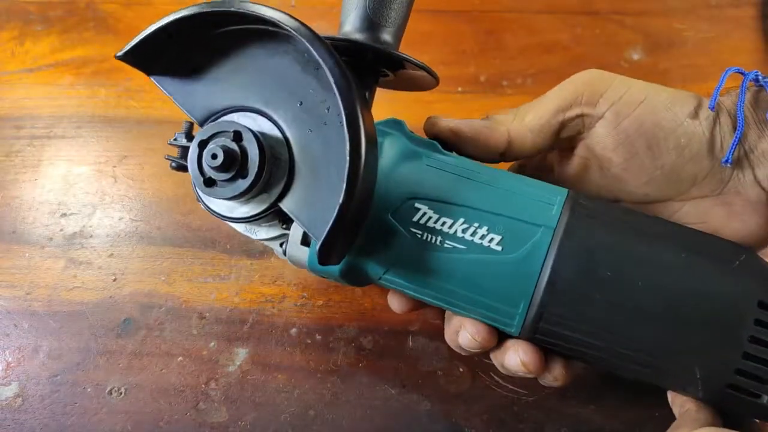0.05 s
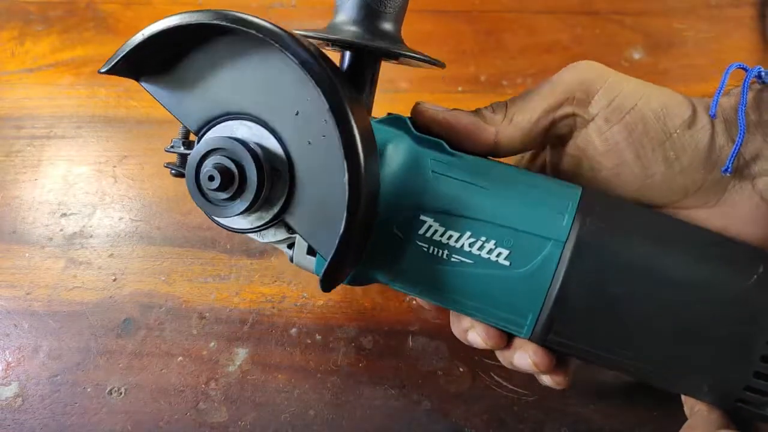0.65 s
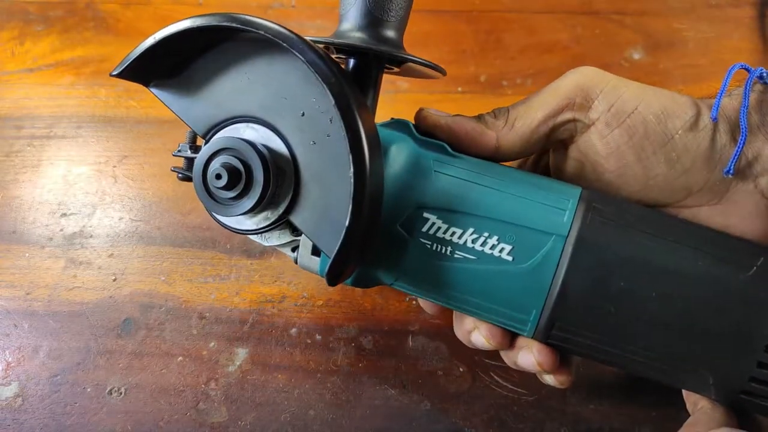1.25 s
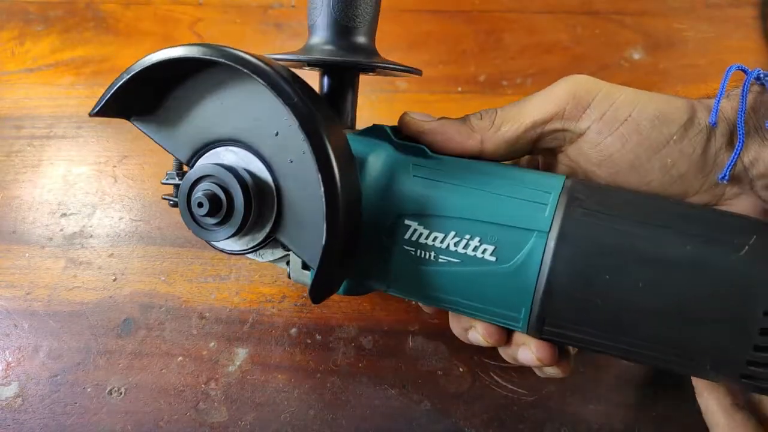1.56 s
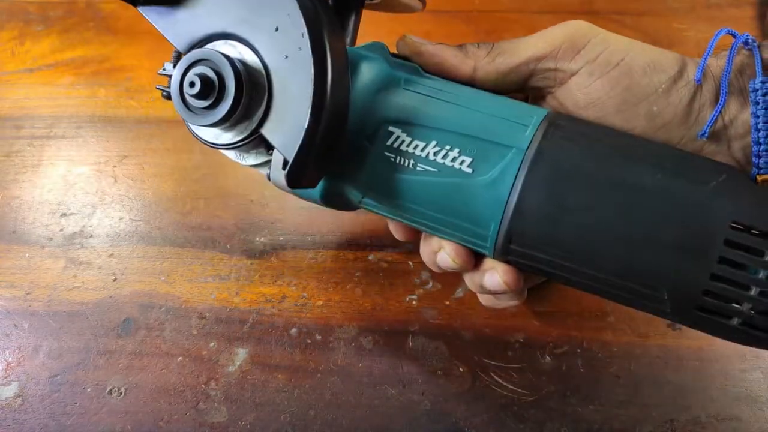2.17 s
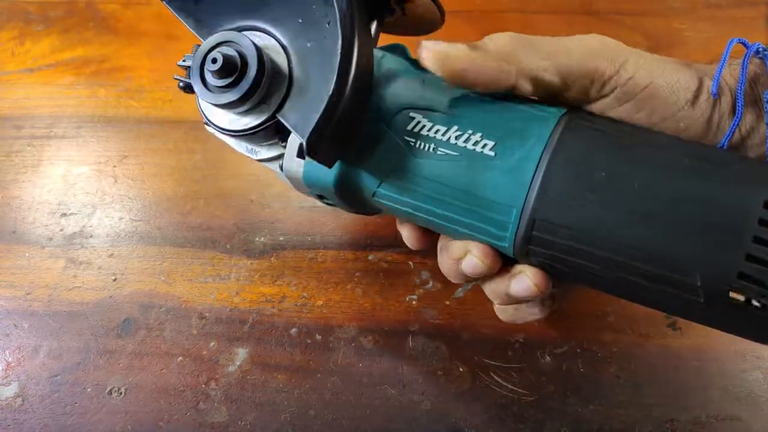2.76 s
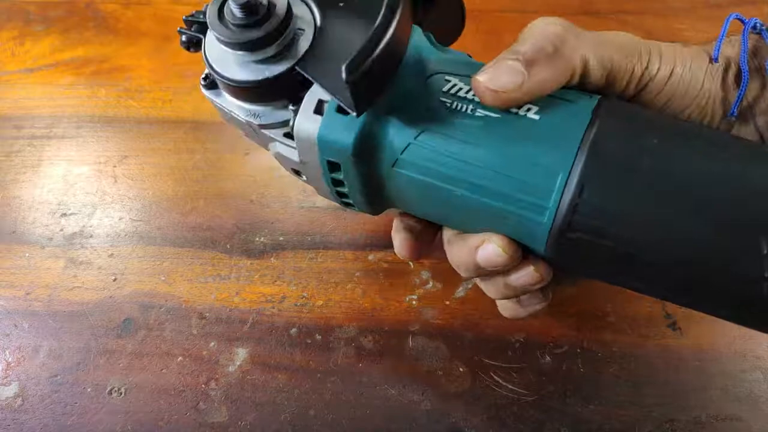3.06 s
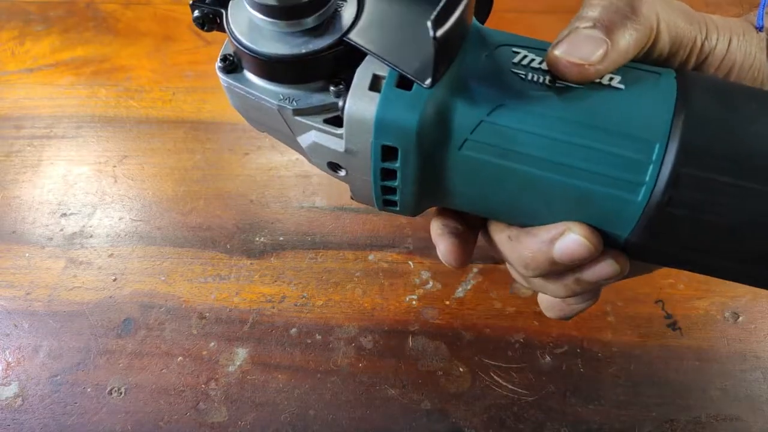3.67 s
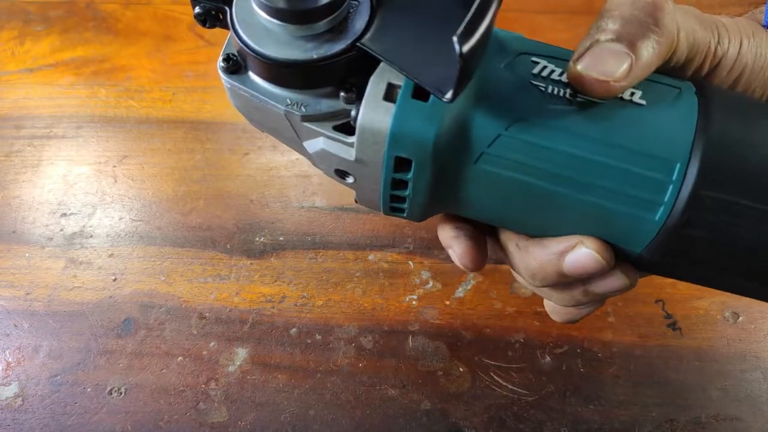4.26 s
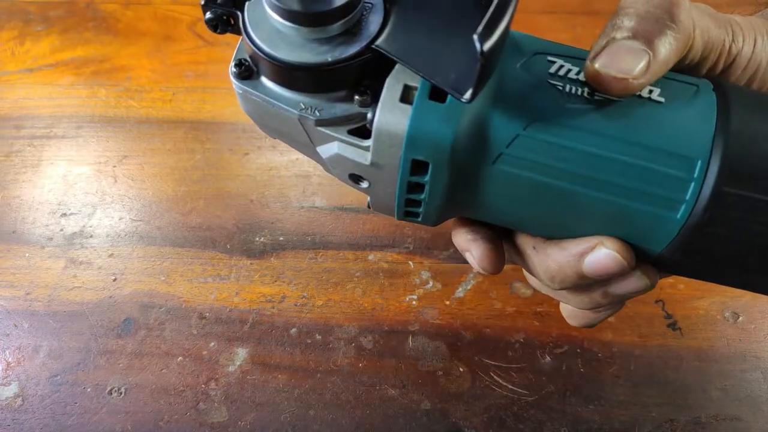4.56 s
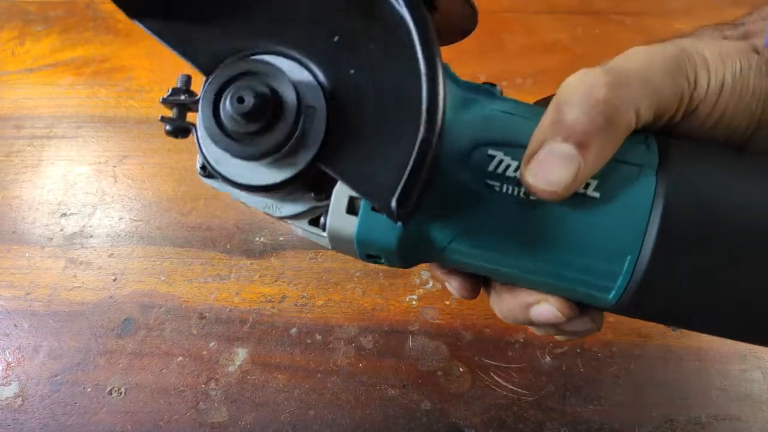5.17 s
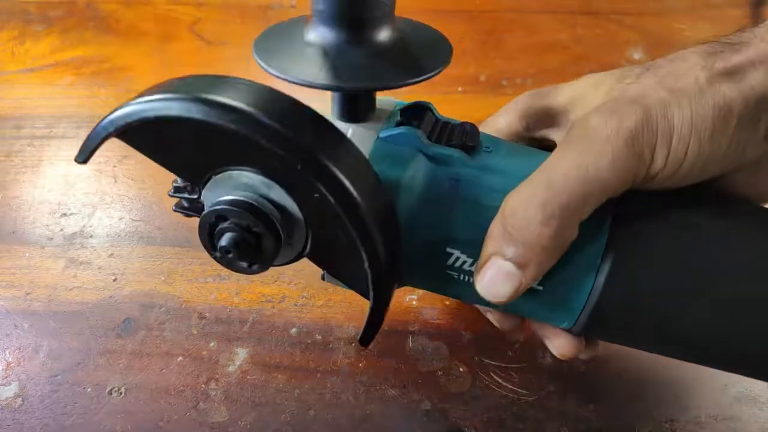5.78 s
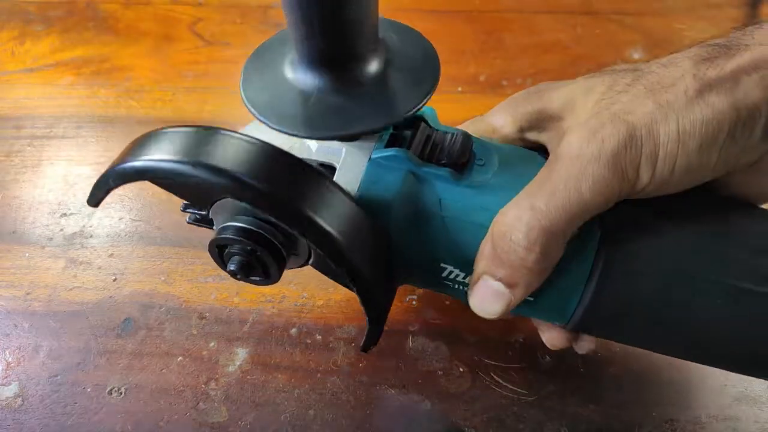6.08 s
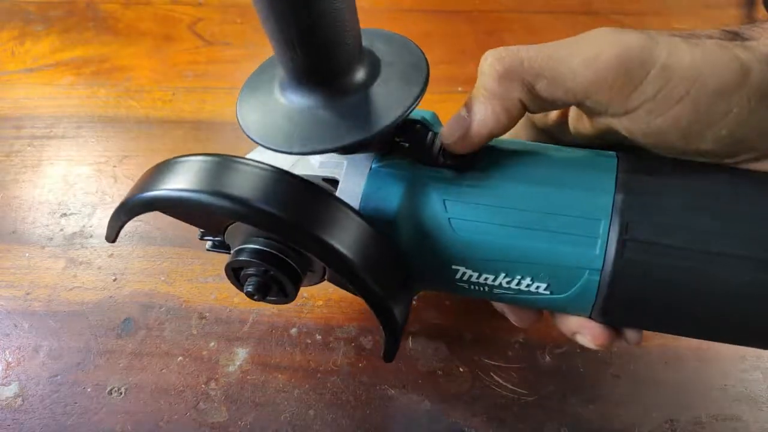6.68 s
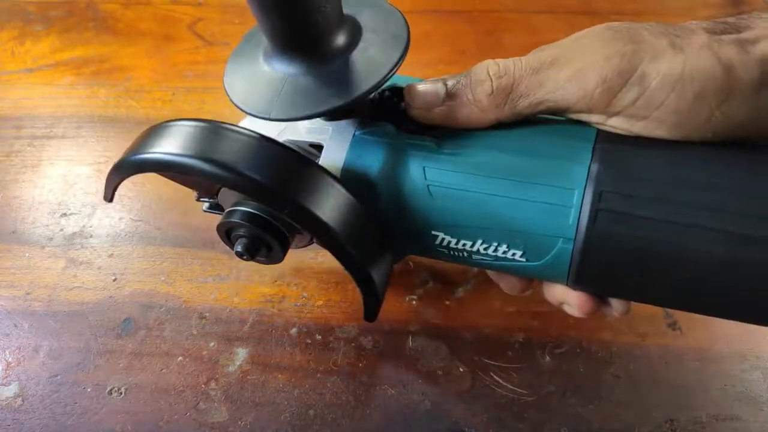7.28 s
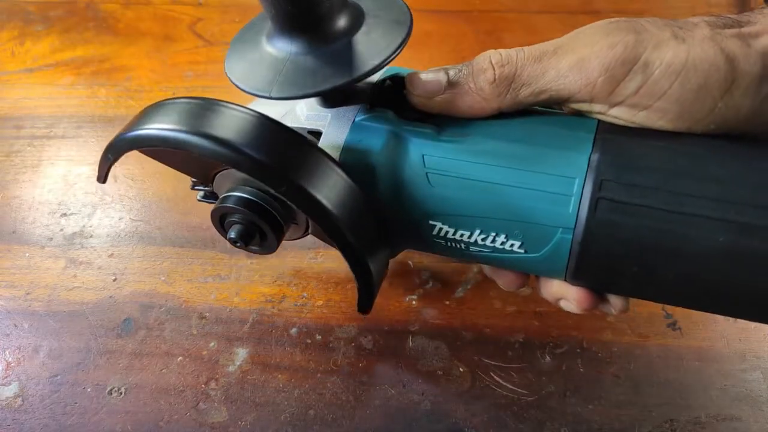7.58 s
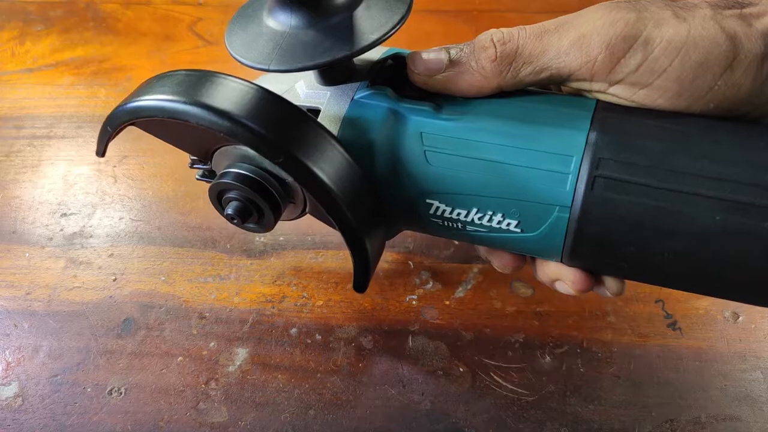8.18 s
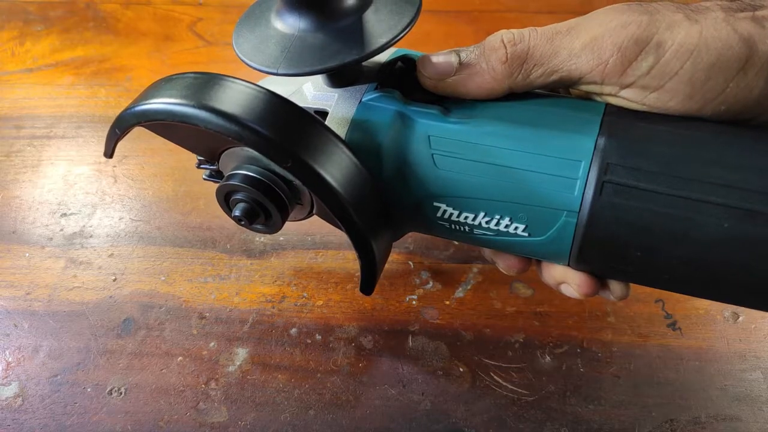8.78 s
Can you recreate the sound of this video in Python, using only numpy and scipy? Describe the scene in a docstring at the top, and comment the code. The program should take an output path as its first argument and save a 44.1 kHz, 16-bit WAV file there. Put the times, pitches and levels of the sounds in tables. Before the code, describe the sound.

Close by in a small room, an angle grinder runs with a high whine, coasts to a rattling halt and starts up again.

```python
"""An angle grinder spins up and coasts

A grinder with no disc is held over a table in a small room, close to a stereo microphone.
It is switched on, whines up to speed, is switched off and coasts until its gears tick to a halt;
then it starts again. The small gear's twelve teeth make the whine as they meet the big gear,
over the rush of the cooling fan and the clatter of the loose gears."""
import sys
import numpy as np
from scipy import signal
from scipy.fft import rfft, irfft, next_fast_len
from scipy.io import wavfile
from scipy.ndimage import map_coordinates

SR = 44100
rng = np.random.default_rng(int(sys.argv[2]) if len(sys.argv) > 2 else 0)


def materialize(psi):
    """Save the field psi as 16-bit PCM at rate SR to the path in sys.argv[1].

    A 1-D psi becomes a single channel; in a 2-D psi each row is a channel.
    """
    bounded = np.clip(np.atleast_2d(psi).T, -1, 1)
    quanta = np.round(bounded * 32767).astype(np.int16)
    wavfile.write(sys.argv[1], SR, quanta)


N = 398663
T = np.arange(N) / SR
FFT_SIZE = next_fast_len(N, True)
HZ = np.fft.rfftfreq(FFT_SIZE, 1 / SR)

# tone colour of the room's hiss: f/Hz, relative level/dB
HISS_COLOUR = [(30, 1.5), (70, -3), (130, -3), (400, -5), (700, -10), (1800, -13.5), (2500, -5),
               (3200, -7.5), (4600, -12.5), (5600, -12.5), (7500, -20), (8400, -16), (12500, -35),
               (16000, -38.5)]
# how strong the room's echoes are: f/Hz, level over the direct sound/dB
ECHO_LEVELS = [(100, 5.5), (350, 3.5), (700, -3), (1500, 3.5), (4500, 2), (9000, 9.5), (15000, 11)]
# fan air brushes the microphone: t/s, level/dB, time to swell or fade/s
AIR_PUFFS = [(0.85, -28.5, 0.032), (.91, -57, 0.034), (3.053, -38.5, 0.14), (7.277, -30.5, 0.054)]
# tone colour of the fan: f/Hz, relative level/dB
FAN_COLOUR = [(30, -14), (120, -14), (330, -15), (580, -9.5), (830, -7), (1150, -3.5), (1800, -1),
              (2500, -6), (4500, 2.5), (5800, -0.5), (7400, -5), (8500, 0.5), (10300, -12), (12500, -21.5),
              (16000, -25)]
# the vents blow towards the left: f/Hz, left minus right/dB
VENT_BALANCE = [(40, 10), (300, -0.5), (3000, 0.5), (4300, 0), (5500, -2), (7300, -4), (8400, 10.5),
                (9300, 6.5), (10500, 0)]
# the motor's brushes drag over its last contacts: t/s, relative level/dB, groan f/Hz
BRUSH_DRAG = [(5.45, -78, 800), (5.62, -60, 520), (5.72, -48.5, 405), (5.79, -45, 316), (5.82, -48, 191),
              (5.85, -50, 204), (5.93, -59, 226)]
# tone colour of the scraping brushes: f/Hz, relative level/dB
BRUSH_COLOUR = [(100, -28), (400, 4), (900, -4), (2200, -2), (4500, -21), (12000, -40)]
# how hard the unbalanced rotor shakes the body: speed/(turns per s), level/dB
SHAKE_LEVELS = [(60, -78), (130, -68), (190, -50.5), (260, -48), (330, -45.5), (400, -34.5), (485, -38)]
# tone colour of the gears: f/Hz, relative level/dB
GEAR_COLOUR = [(40, -53), (250, -17), (550, -8), (1000, -11), (1700, -3.5), (2800, -3.5), (4500, -8.5),
               (6000, -10.5), (7500, -14), (9500, -19.5), (11000, -35), (12500, -46), (16000, -48)]
# notes at which the gear case and guard ring: f/Hz, width/Hz, height at full ring/dB
CASE_NOTES = [(402, 30, 12.5), (826, 195, 14.5), (1516, 24, 10.5), (2360, 180, 4), (2675, 21, 9.5),
              (3650, 300, 4), (4203, 200, 7.5), (8160, 190, 2.5)]
# the switch snaps and the gears take up slack: t/s, relative level/dB, brightness/(dB per octave)
START_SNAPS = [(.6645, -9, -5), (.6702, -6, 4), (7.0892, 4.5, 2)]
# the slowing gears knock, then a thumb taps: t/s, relative level/dB, brightness/(dB per octave)
LATE_KNOCKS = [(5.0265, -23, 0), (5.0375, -21, -2), (5.065, -23, 2), (5.0774, -20.5, -3), (5.1036, -21, 0),
               (5.1208, -27, 3), (5.1447, -24, 1), (5.1677, -24, 0), (5.1961, -27, 2), (5.216, -24.5, 1),
               (5.2423, -27, 2), (5.2819, -27, 2), (5.3443, -33, 0), (5.3662, -28, -5), (5.44, -28.5, 0),
               (5.5342, -34, 0), (5.6406, -29, -5.5), (6.6817, -38, -5)]
# motor runs: on t/s, off t/s, target speed/(turns per s), surge/s, settling/s, surge share/(0-1)
MOTOR_RUNS = [(.6645, 2.396, 483.7, .0574, .321, .544), (7.0892, 9.1, 489.7, .0638, .37, .59)]
# how strongly the gear head sounds the whine at each pitch: f/Hz, level over the clatter/dB
WHINE_LEVELS = [(600, -24), (830, -5), (1020, -23), (1550, -2.5), (1900, -11.5), (2150, -2.5), (2500, -10),
                (3500, -1), (4700, -8), (5450, -4), (5820, -1)]
# the same for the tone an octave higher: f/Hz, level over the clatter/dB
OCTAVE_LEVELS = [(1200, -17), (1700, -20), (2700, -10), (3300, -23), (4100, -6.5), (4800, -12), (5500, 0.5),
                 (6900, -1.5), (7400, -8), (8500, -1.5), (9600, -7), (10400, -15.5), (11700, -14.5)]
# the whine swings from side to side as the tool is turned: t/s, left minus right/dB
WHINE_BALANCE = [(0.75, 2), (1.32, -13), (1.55, 0.5), (2.35, -10), (3.26, 14), (3.37, -12), (3.72, 20),
                 (3.83, 3), (5.2, -5), (7.15, 14), (7.27, -14), (7.52, 5), (7.89, -31), (8.01, -18),
                 (8.14, 3), (9.0, -14.5)]


def amp(db):
    """Turns decibels into a gain."""
    return 10 ** (np.asarray(db) / 20)


def unit(x):
    """Scales a signal to an average power of 1."""
    return x / np.sqrt(np.mean(x ** 2) + 1e-20)


def curves(rows):
    """Turns each table column after the first into a curve over time."""
    times, *columns = np.transpose(rows)
    return [np.interp(T, times, column) for column in columns]


def look_up(table, hz=HZ):
    """Reads a table at any frequency, joining its points along a pitch scale."""
    f, value = np.transpose(table)
    return np.interp(np.log(hz + 1), np.log(f), value)


def colour(x, db):
    """Filters by a dB curve, keeping the power of white noise."""
    return irfft(rfft(x, FFT_SIZE) * unit(amp(db)))[..., :N]


def bass_cut(corner_hz, hz=HZ):
    """A dB curve for hard, short contacts, which make little bass."""
    return -10 * np.log10(1 + (corner_hz / (hz + 1)) ** 2)


def panned(balance_db):
    """Splits a balance into left and right dB, keeping the total power."""
    sides = balance_db * np.array([[.5], [-.5]])
    return sides - 10 * np.log10((amp(sides) ** 2).mean(0))


def drift(hz):
    """A smooth random wiggle of power 1, with up to about hz changes a second."""
    size = next_fast_len(N // 16)
    rolloff = 1 + (np.fft.rfftfreq(size, T[-1] / size) / hz) ** 2
    slow = irfft(rfft(rng.standard_normal(size)) / rolloff, size)
    return unit(np.interp(T, np.linspace(0, T[-1], size), slow))


def linger(power, decay_s):
    """Spreads power into a dying tail."""
    fade = np.exp(-1 / (decay_s * SR))
    return signal.lfilter([1 - fade], [1, -fade], power)


def noise_in_room(power, left_lag_s=.00009, table_s=.0012, walls_s=.0068, walls_share=.034):
    """Noise that reaches the left side later, plus table and wall echoes that differ on each side."""
    echo_power = (1 - walls_share) * linger(power, table_s) + walls_share * linger(power, walls_s)
    delay = np.exp(-2j * np.pi * HZ * np.array([[left_lag_s], [0]]))
    direct = rfft(rng.standard_normal(N) * np.sqrt(power), FFT_SIZE) * delay
    echoes = rfft(rng.standard_normal((2, N)) * np.sqrt(echo_power), FFT_SIZE)
    echo_gain = amp(look_up(ECHO_LEVELS))
    return irfft((direct + echo_gain * echoes) / np.sqrt(1 + echo_gain ** 2))[:, :N]


def ripple(x, depth_db=5, spacing_hz=70, hold_s=.6056):
    """Echoes between tool, hand and table add fine peaks and dips that shift as the hand moves."""
    hz, t, spectra = signal.stft(x, SR, nperseg=2048)
    grid = np.meshgrid(hz / spacing_hz, t / hold_s, indexing="ij")
    pattern = map_coordinates(rng.standard_normal((512, 128)), grid, order=1, mode="mirror")
    gain = amp(depth_db * pattern * np.clip(hz / 2500, 0, 1)[:, None])  # weaker in the bass
    return signal.istft(spectra * unit(gain), SR)[1][:, :N]


def background(hiss_db=-49, hum_hz=70.6, hum_db=-63.5):
    """The room's steady hiss and a low, wavering hum."""
    hum = np.sqrt(2) * np.sin(2 * np.pi * hum_hz * T + .23 * drift(3.2)) * (1 + .12 * drift(5))
    hiss = colour(rng.standard_normal((2, N)), look_up(HISS_COLOUR))
    return amp(hiss_db) * ripple(hiss, hold_s=.3) + amp(hum_db) * hum


def air_puffs(corner_hz=75, right_db=-8):
    """Fan air hits the microphone with a low rumble, different on each side."""
    gusts = sum(amp(db) * np.exp(-((T - at) / swell_s) ** 2) for at, db, swell_s in AIR_PUFFS)
    return gusts * np.array([drift(corner_hz), amp(right_db) * drift(corner_hz)])


def body_bump(at_s=5.812, hz=190, db=-40, decay_s=.022, rise_s=.0035):
    """The plastic body bumps softly in the hand."""
    age = np.maximum(T - at_s, 0)
    envelope = (1 - np.exp(-age / rise_s)) * np.exp(-age / decay_s)
    return np.sqrt(2) * amp(db) * np.sin(2 * np.pi * hz * age) * envelope


def brush_drag(width_hz=80, groan_db=-5, scrape_db=-1):
    """The motor's brushes scrape and groan lower as the rotor stops."""
    db, hz = curves(BRUSH_DRAG)
    level = amp(db) * (T > BRUSH_DRAG[0][0]) * (T < BRUSH_DRAG[-1][0])
    roughness = drift(width_hz) + 1j * drift(width_hz)
    groan = (roughness * np.exp(2j * np.pi * np.cumsum(hz) / SR)).real
    scrape = colour(noise_in_room(level ** 2), look_up(BRUSH_COLOUR))
    return amp(groan_db) * level * groan + amp(scrape_db) * scrape


def case_peaks():
    """The ringing notes of the gear case and guard as a dB curve."""
    return sum(db / (1 + (2 * (HZ - hz) / width) ** 2) for hz, width, db in CASE_NOTES)


def gear_case(x, ring=.82):
    """Blows inside the gear head make its case and guard ring."""
    gain = unit(amp(look_up(GEAR_COLOUR) + ring * case_peaks()))
    cepstrum = irfft(np.log(gain))
    cepstrum[1:FFT_SIZE // 2] *= 2  # minimum phase: the ringing comes after the blow
    cepstrum[FFT_SIZE // 2:] = 0
    return irfft(rfft(x, FFT_SIZE) * np.exp(rfft(cepstrum)))[..., :N]


def knocks(rows, decay_s, gain_db, ring, corner_hz):
    """Each knock is a short burst of contacts with its own brightness, ringing the gear case."""
    power, shaped = np.zeros(N), np.zeros((2, N))
    for at, db, _ in rows:
        power[round(at * SR)] = amp(db + gain_db) ** 2 * decay_s * SR
    bursts = noise_in_room(linger(power, decay_s))
    edges = [round(row[0] * SR) - 64 for row in rows] + [N]
    for (_, _, brightness), start, end in zip(rows, edges, edges[1:]):
        end = min(end, start + SR // 4)
        hz = np.fft.rfftfreq(end - start, 1 / SR)
        shape_db = np.clip(brightness, -2, 2) * np.log2((hz + 300) / 3000) + bass_cut(corner_hz, hz)
        shaped[:, start:end] = irfft(rfft(bursts[:, start:end]) * amp(shape_db), end - start)
    return gear_case(shaped, ring)


def switched_on(rise_s):
    """Rises to 1 while the switch is on, and is 0 while it is off."""
    return sum((1 - np.exp(-np.maximum(T - on, 0) / rise_s)) * (T < off) for on, off, *_ in MOTOR_RUNS)


def rotor_speed(drag_share=.398, drag_s=.951, friction_s=3.39):
    """Turns per second: the motor surges and settles, then air drag and friction slow it down."""
    speed = np.zeros(N)
    for on, off, target, surge_s, settle_s, share in MOTOR_RUNS:
        driven, coasting = np.clip(T - on, 0, off - on), np.maximum(T - off, 0)
        rise = 1 - share * np.exp(-driven / surge_s) - (1 - share) * np.exp(-driven / settle_s)
        fall = drag_share * np.exp(-coasting / drag_s) + (1 - drag_share) * (1 - coasting / friction_s)
        speed += target * rise * np.maximum(fall, 0)
    return speed


def running_level(speed, full_db=-15, boost_db=.58, crawl_db=-47, knee_speed=229, db_per_octave=10.5):
    """The tool's level in dB: full while the motor pulls, sinking with speed as it coasts."""
    drop_db = db_per_octave * np.log2(knee_speed / (speed + 1))
    coasting = amp(full_db) / np.sqrt(np.hypot(1, amp(drop_db) ** 2))
    driven = amp(full_db + boost_db) * switched_on(rise_s=.01)
    level = np.maximum(np.hypot(coasting, amp(crawl_db)), driven)
    return 20 * np.log10(level) + .5 * drift(1.5)


def rotor_shake(speed, waver=.33):
    """The unbalanced rotor shakes the body once a turn, making a hum."""
    hum = np.sin(2 * np.pi * np.cumsum(speed) / SR) * (1 + waver * drift(4.8))
    return np.sqrt(2) * amp(look_up(SHAKE_LEVELS, speed)) * hum * (speed > 0)


def tooth_rasp(load, db=-15, centre_hz=3400, octaves=.93, floor_db=-22):
    """The teeth grind while the motor pulls the rotor up to speed."""
    band_db = np.maximum(-4 * (np.log2((HZ + 1) / centre_hz) / octaves) ** 2, floor_db)
    return amp(db) * colour(noise_in_room(load), band_db + np.minimum(look_up(FAN_COLOUR), 0))


def tooth_blows(speed, min_speed=77, jitter_s=.0016, uneven_db=2.4, decay_s=.0004):
    """The power of loose teeth knocking about once a turn, less even in strength when slow."""
    turns = np.flatnonzero(np.diff(np.floor(np.cumsum(speed) / SR)))
    turns = turns[speed[turns] > min_speed]
    late, strength = rng.standard_normal((len(turns), 2)).T
    slowness = 1 - speed[turns] / speed.max()
    energy = amp(uneven_db * slowness * np.clip(strength, -2, 1.5)) ** 2
    hits = np.clip(turns + np.round(late * jitter_s * SR).astype(int), 0, N - 1)
    return linger(np.bincount(hits, energy / energy.mean() * SR / speed[turns], N), decay_s)


def fan_and_clatter(speed, level_db, gust_db=.5, rub_db=-5.5, blows_db=-2.5):
    """Rushing fan air takes over at high speed; lower down, the gears rub and knock."""
    power = amp(level_db) ** 2 * (speed > 0)
    fan_share = .99 * (speed / speed.max()) ** 1.64
    gear_power = power * (1 - fan_share)
    air = noise_in_room(power * fan_share * amp(gust_db * drift(26.7)) ** 2)
    air = colour(air, look_up(FAN_COLOUR) + .4 * case_peaks())
    rub = noise_in_room(gear_power)
    blows = colour(noise_in_room(gear_power * tooth_blows(speed)), bass_cut(corner_hz=2300))
    clatter = gear_case(amp(rub_db) * rub + amp(blows_db) * blows)
    return colour(ripple(air + clatter), panned(look_up(VENT_BALANCE)))


def gear_whine(speed, level_db, load, teeth=12, load_db=-8, flutter=.15, scatter=.11):
    """Meeting teeth sing a tone and three overtones, made rough by chatter when slow or under load."""
    hz = teeth * speed
    # echoes add up and cancel, so the two lowest tones swell and fade on each side
    fades_db = 2.5 * np.clip([[drift(6) for side in range(2)] for tone in range(2)], -2, 1)
    facing_db = 2 * (T > MOTOR_RUNS[1][0])  # the gear head faces the microphone on the second run
    tones_db = [facing_db + look_up(WHINE_LEVELS, hz) + panned(curves(WHINE_BALANCE)[0]) + fades_db[0],
                look_up(OCTAVE_LEVELS, 2 * hz) + panned(look_up(VENT_BALANCE, 2 * hz)) + fades_db[1],
                -29,
                -34 - 30 * np.clip(4 * hz / 10000 - 1, 0, 1)]
    left_lags_s = [.000055, .00008, .00008, .00008]
    chatter = 1 + 3 * (1 - speed / speed.max()) + 4 * load
    phase = 2 * np.pi * np.cumsum(hz) / SR + .086 * chatter * drift(57)
    phase = phase + .3 * np.array([drift(25), drift(5.3)])  # the moving hand shifts each side's path
    tremble = 1 + flutter * chatter * drift(68)
    rough_size = np.sqrt(1 + (flutter ** 2 + 2 * scatter ** 2) * chatter ** 2)
    whine = np.zeros((2, N))
    for k, (db, lag_s) in enumerate(zip(tones_db, left_lags_s), 1):
        lag = 2 * np.pi * hz * np.array([[lag_s], [0]])
        echoes = np.array([drift(14) + 1j * drift(33) for side in range(2)]) if k < 3 else 0
        roughness = (tremble + scatter * chatter * echoes) / rough_size  # adds no power
        tone = (np.exp(1j * k * (phase - lag)) * roughness).real
        treble_fade = np.clip((17000 - k * hz) / 1000, 0, 1)
        whine += np.sqrt(2) * amp(level_db + db + k * load_db * load ** 2) * tone * treble_fade
    return whine * np.clip((speed - 35) / 25, 0, 1)  # no whine at a crawl


def scene():
    """The rotor's speed drives the running sounds; the load is high until it nears top speed."""
    speed = rotor_speed()
    level_db = running_level(speed)
    load = switched_on(rise_s=.056) * (1 - speed / speed.max())
    snaps = knocks(START_SNAPS, decay_s=.0003, gain_db=-2.5, ring=.5, corner_hz=300)
    ticks = knocks(LATE_KNOCKS, decay_s=.00049, gain_db=5.5, ring=.74, corner_hz=1600)
    tones = gear_whine(speed, level_db, load) + rotor_shake(speed)
    noises = fan_and_clatter(speed, level_db) + tooth_rasp(load)
    return tones + noises + snaps + ticks + brush_drag() + body_bump() + air_puffs() + background()


def record(dry, silent_until_s=.605, cutoff_hz=15900):
    """Keeps the start silent, clips peaks at full scale and cuts the highest treble."""
    clipped = np.clip(dry * (T > silent_until_s), -1, 1)
    lowpass = signal.firwin(511, cutoff_hz, window=("kaiser", 9), fs=SR)
    return signal.oaconvolve(clipped, lowpass[None], "same")


dry = scene()
out = record(dry)
materialize(out)
```